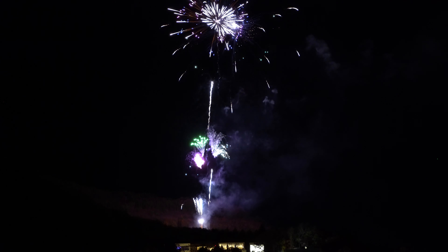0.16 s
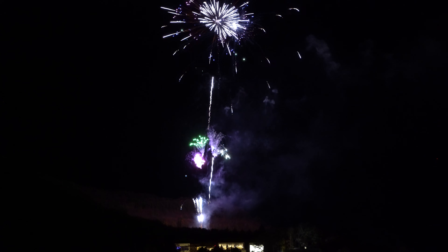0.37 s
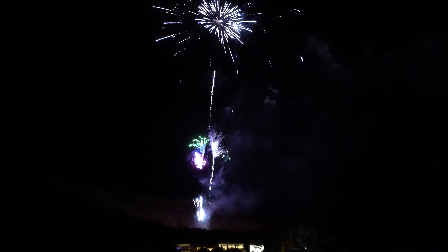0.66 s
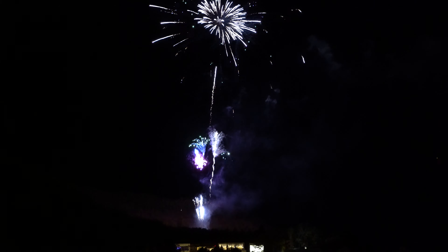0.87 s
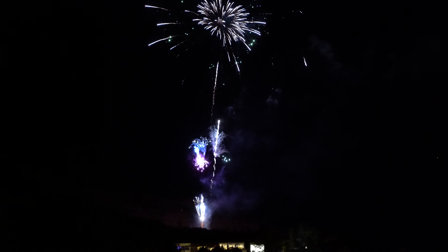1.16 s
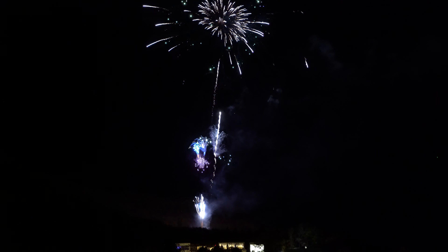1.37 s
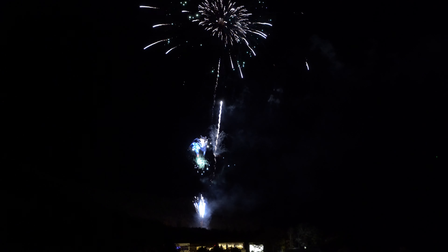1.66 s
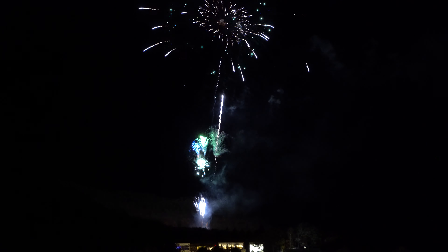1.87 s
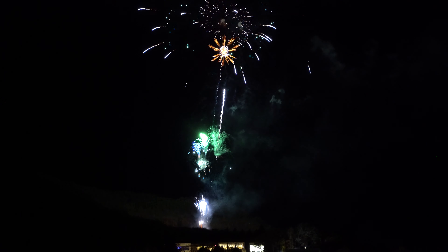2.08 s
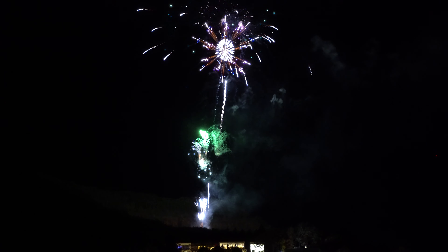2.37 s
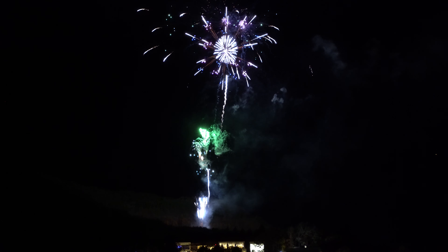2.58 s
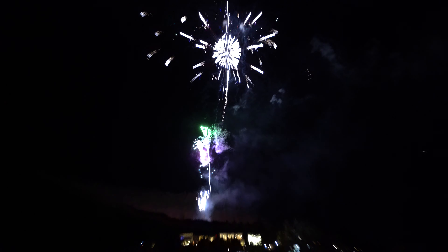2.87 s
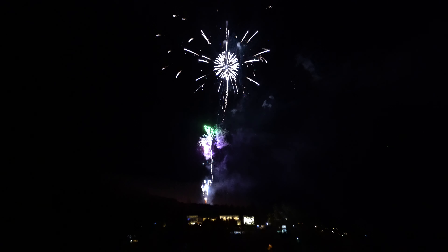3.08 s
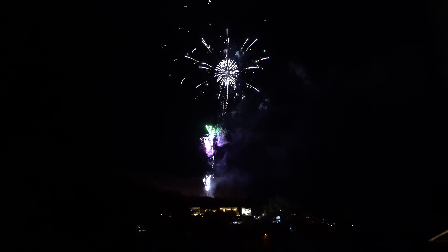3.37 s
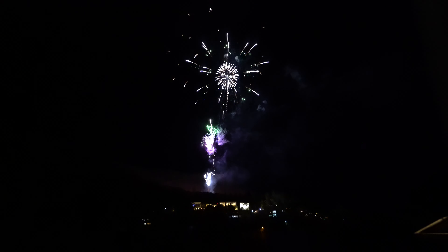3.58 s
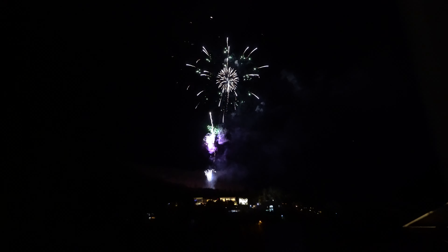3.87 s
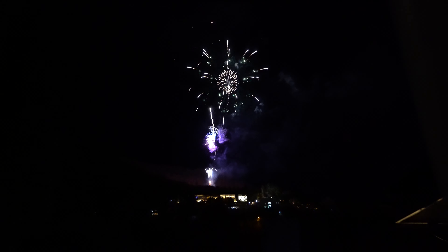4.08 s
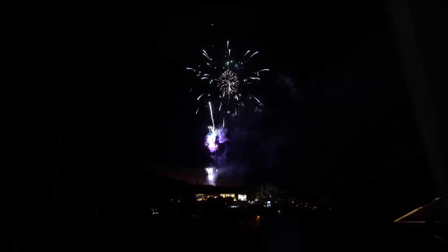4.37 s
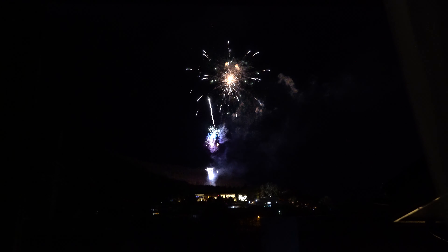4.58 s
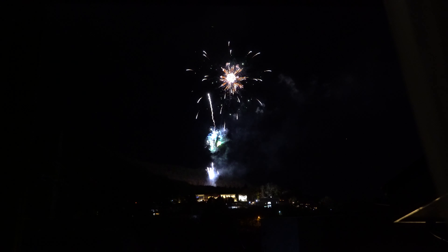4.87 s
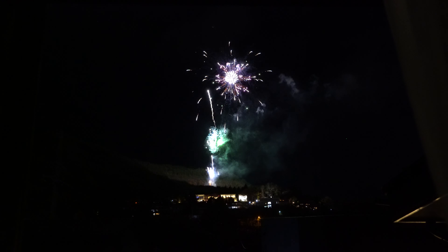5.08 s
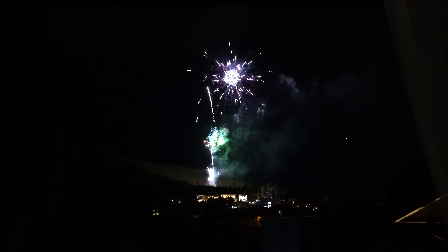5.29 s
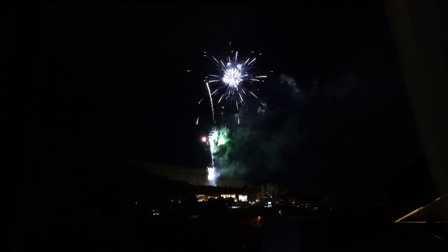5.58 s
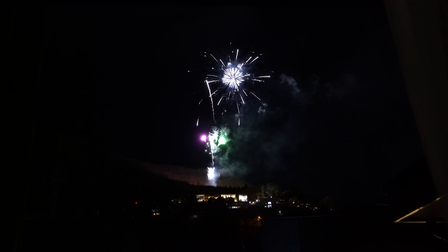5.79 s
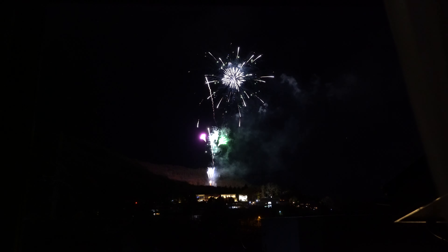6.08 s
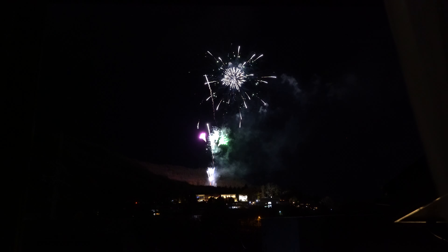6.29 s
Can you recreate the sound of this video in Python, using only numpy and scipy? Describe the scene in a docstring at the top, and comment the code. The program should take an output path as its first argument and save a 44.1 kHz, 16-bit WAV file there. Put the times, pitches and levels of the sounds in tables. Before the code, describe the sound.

Fireworks go off far away outdoors at night. Three large shells burst a few seconds apart, each a dulled crack with a deep thump and an echo rolling back from the hills. Smaller shells crack sharply between them, with faint pops, over a quiet dull roar and low hum. Close to the microphone, cloth rubs faintly, with a few tiny snaps, and slides again near the end.

```python
"""Outdoors at night, far from a fireworks show: three large shells boom, smaller ones crack between.
Each blast wave arrives dulled by the air, thumps in the nearby walls and rolls back from the hills.
Under it all are the dull roar of burning firework stars and a low hum.
Close to the microphone, cloth rubs and slides, and a few tiny snaps are heard."""
import sys
import numpy as np
from scipy import signal
from scipy.fft import rfft, irfft
from scipy.io import wavfile
from scipy.ndimage import uniform_filter1d

SR = 44100
rng = np.random.default_rng(int(sys.argv[2]) if len(sys.argv) > 2 else 0)


def dump(signal):
    """Clip the signal to [-1, 1] and save it as 16-bit WAV at the path in sys.argv[1]."""
    limited = np.clip(np.atleast_2d(signal).T, -1, 1)
    pcm = np.round(limited * 32767).astype(np.int16)
    wavfile.write(sys.argv[1], SR, pcm)


N = 284180
BLAST_LR_DB = -2  # "lr" is left minus right: below zero leans right

# how alike the two ears hear distant sound: (frequency [Hz], likeness [0 to 1])
LIKENESS = [(60, 1), (180, 0.99), (550, 0.92), (1650, 0.91), (4970, 0.091), (15000, 0.34)]
# large shells: (time [s], crack peak [dB], crack pitch [Hz], second front delay [ms],
# its strength [ratio], echo bass [dB], treble [dB], thump [dB], thump pitch [Hz], crackle [dB],
# change to its returns from the slopes [dB])
LARGE_SHELLS = [(0.8213, -6, 237, 3.82, 1.14, -0.5, 13, -12.5, 66.6, -30, 1),
                (3.538, -9.5, 288, 1.86, 1.8, -15.5, 10, -9, 63.7, -17.5, 0.5),
                (5.8901, -9, 285, 2.37, 1, -1, 13, -10, 73.3, -20, -5.5)]
# how slopes change a large shell as they throw it back:
# (delay [s], echoes [dB], crack [dB], thump [dB], treble [dB])
SLOPE_RETURNS = [(.087, -14.5, -13, -11.5, 8), (0.311, -23, -40, -19.5, -16)]


def amp(db):
    """Turns decibels into a gain."""
    return 10 ** (np.asarray(db) / 20)


def read(points, hz):
    """Looks up a table by frequency, on a log scale."""
    f, value = np.transpose(points)
    return np.interp(np.log(hz + 1), np.log(f + 1), value)


def add(mix, s, sound):
    """Adds a two-channel sound at s seconds."""
    part = mix[:, round(s * SR):][:, :sound.shape[1]]
    part += sound[:, :part.shape[1]]


def panned(x, lr_db):
    """Spreads a sound over left and right."""
    return x * amp(np.vstack([lr_db / 2, -lr_db / 2]))


def noise_spectrum(colour, likeness):
    """Spectrum of two-channel noise of average (rms) size 1, with the given tone colour."""
    hz = np.fft.rfftfreq(N, 1 / SR)
    left, other = rfft(rng.standard_normal((2, N)))
    right = likeness * left + np.sqrt(1 - likeness ** 2) * other
    spectrum = np.array([left, right]) * amp(read(colour, hz))
    return spectrum / np.sqrt(np.mean(irfft(spectrum, N) ** 2))


def wander(rate_hz):
    """A smooth random curve of average (rms) size 1."""
    width = int(SR / rate_hz)
    curve = uniform_filter1d(uniform_filter1d(rng.standard_normal(N), width), width)
    return curve / np.sqrt(np.mean(curve ** 2))


def burning_roar(bass_lift_db=0.5, rise_s=0.12, fall_db_per_s=31.5):
    """Burning stars make a wide, dull roar; late returns from distant hills swell over it."""
    # the steady roar: (time [s], level [dB], treble change [dB])
    steady = [(0, -48, -3), (.25, -54, -2.5), (0.599, -53.5, -3), (1.4, -48.5, 4.5), (2.2, -52, 3),
              (2.9, -55.5, 3.5), (3.451, -48.5, 5), (4.199, -48.5, 5.5), (4.45, -48.5, 3),
              (5.0, -51.5, 4.5), (5.3, -50.5, -14), (5.62, -55, 8), (6.44, -48.5, 4)]
    # its tone colour: (frequency [Hz], level per Hz [dB])
    colour = [(42, -52), (72, -1), (154, -11), (268, -1), (349, -8.5), (440, 1.5), (710, -12.5), (818, -6),
              (1170, -15), (1720, -19.5), (2500, -45), (5000, -72.5), (6500, -85), (11000, -120)]
    # late returns: (peak time [s], level [dB], treble change [dB], bass change [dB])
    swells = [(.76, -48.5, 7, -24.5), (1.1, -47.5, 0.5, 8.5), (3.252, -55, 15.5, -9), (3.85, -45, -8, 4.5),
              (4.66, -45.5, -3, 15.5), (5.76, -48, 10, 0.5), (6.18, -39, -9, 17)]
    t, hz = np.arange(N) / SR, np.fft.rfftfreq(N, 1 / SR)
    noise = noise_spectrum(colour, read(LIKENESS, hz))
    s, db, treble_db = np.transpose(steady)
    db = np.interp(t, s, db)
    power = amp([db, db + np.interp(t, s, treble_db), db + bass_lift_db]) ** 2  # middle, treble, bass
    for peak, db, treble_db, bass_db in swells:
        shape = np.clip(1 + (t - peak) / rise_s, 0, 1) * amp(-fall_db_per_s * np.maximum(t - peak, 0))
        power += (amp([db, db + treble_db, db + bass_db])[:, None] * shape) ** 2
    treble, bass = 1 / (1 + (650 / (hz + 1)) ** 4), 1 / (1 + (hz / 130) ** 4)
    bands = irfft(noise * np.array([1 - treble - bass, treble, bass])[:, None], N)
    return (bands * np.sqrt(power)[:, None]).sum(0) * amp(0.87 * wander(44))


def hum(hz=46, db=-50.5):
    """A low drone wavers a little in pitch and loudness."""
    turns = np.cumsum(hz + 0.62 * wander(1.0)) / SR
    return amp(db + 0.98 * wander(1.1)) * np.sqrt(2) * np.sin(2 * np.pi * turns)


def friction(colour, likeness, grain_db):
    """Rubbing makes noise with a fine grain."""
    return irfft(noise_spectrum(colour, likeness), N) * amp(grain_db * wander(150))


def cloth_slides():
    """Cloth slides faintly at the start; near the end a long slide swells and fades."""
    # loudness, one list per slide: (time [s], level [dB])
    slides = [
        [(0, -76), (.6, -79.5)],
        [(4.85, -84), (5.15, -77), (5.43, -64.5), (5.55, -67.5), (5.68, -63.5), (5.86, -56), (6.2, -60.5),
         (6.44, -77.5)],
    ]
    # the long slide crosses from right to left: (time [s], left minus right [dB])
    sides = [(5.1, -5), (5.7, 3.5), (6.44, 1)]
    # tone colour of sliding cloth: (frequency [Hz], level per Hz [dB])
    colour = [(1760, 0), (3000, -3.5), (6020, -8), (6500, -8), (10600, -12), (11100, -11.5), (15600, -19.5)]
    t = np.arange(N) / SR
    motion = sum(amp(np.interp(t, *np.transpose(slide), left=-200, right=-200)) for slide in slides)
    lr_db = np.interp(t, *np.transpose(sides))
    return panned(motion, lr_db) * friction(colour, likeness=0.4, grain_db=1.0)


def blasts():
    """Lists every blast: large shells, their returns from the slopes, then small shells and pops."""
    # small shells: (time [s], crack peak [dB], crack pitch [Hz], second front delay [ms],
    # its strength [ratio, negative flips it], near echoes [dB], treble [dB])
    small_shells = [(0.537, -21.5, 423, 2.3, -0.04, -35, -21), (1.1982, -12.5, 408, 0.47, -1.3, -30, -8.5),
                    (1.944, -9, 383, 0.3, -0.93, -24.5, -6), (2.977, -16.5, 288, 1.6, -1.7, -30.5, -5),
                    (3.0321, -23, 785, 2.21, 0.85, -35.5, -7), (4.032, -7.5, 386, 0.47, -2.9, -28.5, 3.5),
                    (5.0964, -6, 350, 1.1, 0.84, -26, 2), (5.536, -24.5, 382, 0.93, -1.9, -33.5, -9),
                    (6.2533, -11, 415, 3.4, 0.017, -28, -3.5)]
    # faint pops of low fireworks: (time [s], crack peak [dB], crack pitch [Hz])
    faint_pops = [(.501, -38.5, 385), (.647, -41.5, 502), (1.924, -31, 324), (2.33, -48, 1250),
                  (2.499, -36.5, 460), (3.919, -45, 600), (4.499, -34, 465), (4.586, -36, 610),
                  (4.64, -34, 930), (5.256, -40, 487), (5.502, -34, 430)]
    # Rows built here: the first five columns above, then, in dB, near echoes, their bass, far echoes,
    # their bass, treble and thump, and last the thump pitch in Hz.
    large = np.array([(*front, -18, bass_db, -32, -0.9, treble_db, thump_db, thump_hz)
                      for *front, bass_db, treble_db, thump_db, thump_hz, _, _ in LARGE_SHELLS])
    level_columns = [0, 1, 0, 0, 0, 1, 0, 1, 0, 0, 1, 0]  # crack, near and far echoes, thump
    thrown_back = large + np.outer(np.array(LARGE_SHELLS)[:, -1], level_columns)
    returns = [thrown_back + [delay, crack_db, 0, 0, 0, echo_db, 0, echo_db, 0, treble_db, thump_db, 0]
               for delay, echo_db, crack_db, thump_db, treble_db in SLOPE_RETURNS]
    pops = [(s, db, hz, 2.0, 0.37, db - 6, -27.5) for s, db, hz in faint_pops]  # as small-shell rows
    small = [(s, db, hz, *second, near_db, -14, near_db - 17.5, -14, treble_db, db - 16.5, hz / 2)
             for s, db, hz, *second, near_db, treble_db in small_shells + pops]
    return np.concatenate([large, *returns, small])


def crack(hz, delay_ms, second_strength, haze):
    """A steep pressure front rings a few short tones; a second front follows; the air dulls both."""
    # ringing tones: (multiple of the crack pitch, time to fade by 60 dB [s], level [dB])
    tones = [(1, 0.017, 3), (2.4, 0.039, -18), (3.6, 0.011, -12), (.53, 0.07, -22)]
    # what the long path through the air leaves: (frequency times haze [Hz], level [dB])
    air = [(700, 0), (1800, -3), (2300, -12), (2800, -30), (3900, -56), (5500, -85), (9000, -135)]
    t = np.arange(4096) / SR
    ring = sum(amp(db - 60 * t / fade_s) * np.cos(2 * np.pi * k * hz * t) for k, fade_s, db in tones)
    delay = round(delay_ms / 1000 * SR)
    ring = ring + second_strength * np.pad(ring, (delay, 0))[:len(t)]
    loss_db = read(air, haze * np.fft.rfftfreq(len(t), 1 / SR))
    log_gain = np.log(amp(np.r_[loss_db, loss_db[-2:0:-1]]))
    air_filter = np.fft.ifft(np.exp(np.conj(signal.hilbert(log_gain)))).real  # silent before the front
    out = signal.fftconvolve(ring, air_filter)[:len(t)]
    return out / abs(out).max()


def thump(hz, swell_turns=0.67):
    """The suction behind the front swings into a low ring that swells and dies."""
    turns = hz * np.arange(8192) / SR
    return -np.e * turns / swell_turns * np.exp(-turns / swell_turns) * np.sin(2 * np.pi * turns)


def blast_fronts():
    """Each blast wave arrives as a crack with a thump just behind it."""
    out = np.zeros((2, N))
    for s, db, hz, delay_ms, second_strength, *_, treble_db, thump_db, thump_hz in blasts():
        haze = amp(-0.15 * treble_db)  # low bursts cross more air near the ground
        add(out, s, panned(amp(db) * crack(hz, delay_ms, second_strength, haze), BLAST_LR_DB))
        add(out, s + 0.12 / thump_hz, panned(amp(thump_db) * thump(thump_hz), lr_db=-1.3))
    return out


def rolling_echoes(bands=12):
    """Countless echoes merge into noise that dies away in lumps: near ones fast, far ones slowly."""
    # tone colour of the echoes: (frequency [Hz], level per Hz [dB])
    colour = [(18, -38), (30, -26), (76, 3), (129, -14), (250, -10), (404, -15), (609, -16), (668, -17),
              (940, -15), (2340, -36.5), (4860, -80), (7000, -87.5), (9100, -113), (15400, -120)]
    # which way they lean: (frequency [Hz], left minus right [dB])
    sides = [(60, 0.5), (180, -1), (550, 0), (1650, -3.5), (4970, 1.5), (15000, 5)]
    # near echoes of large shells: (frequency [Hz], time to fade by 60 dB [s])
    near_fade = [(50, 0.52), (200, 0.36), (800, 0.15), (2000, 0.19), (4000, 0.094)]
    # how small blasts stretch that time: (frequency [Hz], factor)
    small_stretch = [(200, 1.22), (600, 0.93), (2000, 0.79)]
    # far echoes: (frequency [Hz], time to fade by 60 dB [s])
    far_fade = [(50, 1.4), (110, 4), (200, 4.16), (800, 1.1), (2000, 2.15), (4000, 1.2)]
    hz = np.fft.rfftfreq(N, 1 / SR)
    noise = panned(noise_spectrum(colour, read(LIKENESS, hz)), read(sides, hz))
    s, *_, near_db, near_bass_db, far_db, far_bass_db, treble_db, _, _ = blasts().T
    is_large = np.arange(len(s)) < (1 + len(SLOPE_RETURNS)) * len(LARGE_SHELLS)
    centres, out = np.geomspace(45, 5500, bands), np.zeros((2, N))
    band_position = np.interp(np.log(hz + 1), np.log(centres), np.arange(bands))
    lumps = wander(11)
    for k, f in enumerate(centres):
        bass, treble = 1 / (1 + (f / 130) ** 4), 1 / (1 + (2400 / f) ** 4)
        near = amp(near_db + bass * near_bass_db + treble * treble_db) ** 2
        far = amp(far_db + bass * far_bass_db + treble * treble_db) ** 2
        power = np.zeros(N)
        for start_power, fade_s in [(near * is_large, read(near_fade, f)),
                                    (near * ~is_large, read(near_fade, f) * read(small_stretch, f)),
                                    (far, read(far_fade, f))]:
            kicks = np.bincount((s * SR).astype(int), start_power, N)
            power += signal.lfilter([1], [1, -10 ** (-6 / (fade_s * SR))], kicks)
        rise = np.exp(-1 / (SR * (0.0007 + 0.35 / f)))  # echoes build up, the bass more slowly
        loudness = signal.lfilter([(1 - rise) ** 2], [1, -2 * rise, rise ** 2], np.sqrt(power))
        band = irfft(noise * np.cos(np.pi / 2 * np.clip(band_position - k, -1, 1)), N)
        out += band * loudness * amp(1.1 * lumps + 1.9 * wander(22))
    return out


def cloth_rubs(edge_share=0.38, settle_s=0.15, settle_db=-10, jerk_db=1.6):
    """Cloth rubs in short, jerky strokes and settles faintly after each one."""
    # strokes: (time [s], length [s], level [dB], change over the stroke [dB])
    strokes = [(0.62, 0.25, -66, -11), (.86, .08, -74.5, -10), (1.877, 0.11, -72, -2),
               (2.024, 0.094, -54, 1.5), (2.108, 0.14, -61.5, -12), (2.387, 0.12, -65.5, -7),
               (2.523, 0.092, -70, 15), (2.597, 0.055, -51.5, -6), (2.638, 0.13, -64.5, -9),
               (2.83, 0.38, -68.5, -2.5)]
    # tone colour of rubbing cloth: (frequency [Hz], level per Hz [dB])
    colour = [(1760, 8.5), (3000, -2.5), (4010, -8), (6280, -12), (9300, -10.5), (10100, -2.5), (11700, -2),
              (15600, -7.5)]
    motion = np.zeros((2, N))
    for s, length, db, change_db in strokes:
        progress = np.arange(0, 1, 1 / (length * SR))
        ramp = np.clip(np.minimum(progress, 1 - progress) / edge_share, 0, 1)
        stroke = amp(db + change_db * progress) * np.sin(np.pi / 2 * ramp) ** 2
        add(motion, s, panned(stroke, lr_db=-6))
    linger = np.exp(-1 / (settle_s * SR))
    motion += amp(settle_db) * signal.lfilter([1 - linger], [1, -linger], motion)
    return motion * amp(jerk_db * wander(30)) * friction(colour, likeness=0.17, grain_db=1.2)


def front_crackle(rise_s=0.0033):
    """The front of each large shell arrives torn into a brief, bright crackle."""
    # tone colour of the crackle: (frequency [Hz], level per Hz [dB])
    colour = [(500, -27), (1000, 3), (1600, -1), (2400, -48), (3000, -33), (3900, -35.5), (4900, -63.5),
              (8000, -110)]
    age, loudness = np.arange(2048) / SR / rise_s, np.zeros((2, N))
    for s, *_, crackle_db, _ in LARGE_SHELLS:
        add(loudness, s, panned(amp(crackle_db) * age * np.exp(1 - age), BLAST_LR_DB))
    return loudness * irfft(noise_spectrum(colour, likeness=0.96), N)


def tiny_snaps(hz=12500, fade_s=0.00032):
    """Each snap near the microphone is a very high ring that dies at once."""
    # snaps: (time [s], level [dB], left minus right [dB])
    snaps = [(2.3815, -63, -10), (2.4603, -66.5, -5), (3.4901, -68.5, -20), (4.605, -56, -4)]
    out, t = np.zeros((2, N)), np.arange(200) / SR
    ring = np.exp(-t / fade_s) * np.sin(2 * np.pi * hz * t)
    for s, db, lr_db in snaps:
        add(out, s, panned(amp(db) * ring, lr_db))
    return out


def scene():
    """All the sounds meet at the microphone."""
    fireworks = blast_fronts() + front_crackle() + rolling_echoes() + burning_roar()
    return fireworks + hum() + cloth_rubs() + cloth_slides() + tiny_snaps()


def record(dry):
    """The microphone adds a faint hiss, then the highest treble is cut off."""
    # tone colour of the hiss: (frequency [Hz], level per Hz [dB])
    colour = [(2350, -40.5), (4000, 1), (4850, -2), (7610, -3), (10200, -4.5), (15600, -6.5)]
    hiss = amp(-85) * irfft(noise_spectrum(colour, likeness=0.1), N)
    treble_cut = signal.firwin(511, cutoff=15740, window=("kaiser", 9), fs=SR)
    return signal.oaconvolve(dry + hiss, treble_cut[None], "same")


dry = scene()
out = record(dry)
dump(out)
```